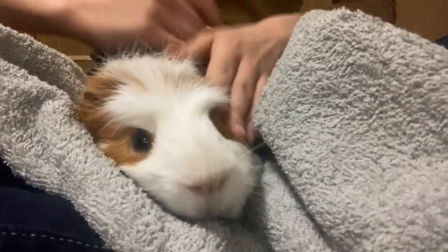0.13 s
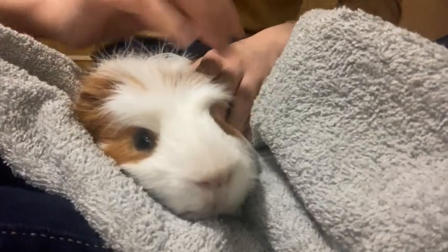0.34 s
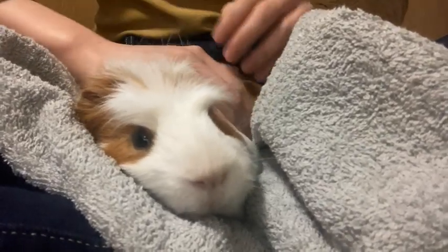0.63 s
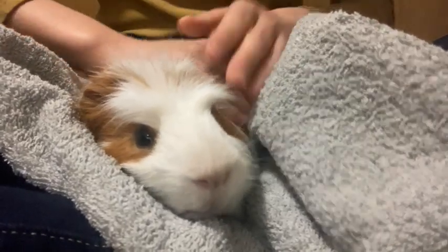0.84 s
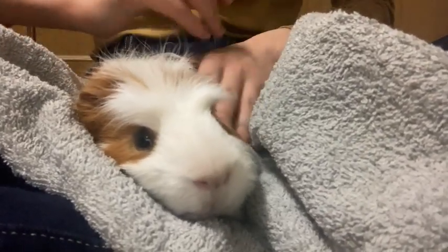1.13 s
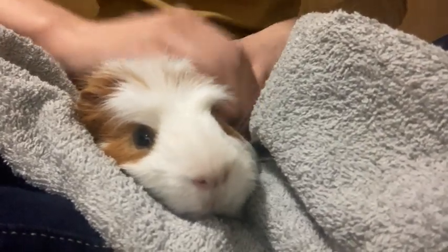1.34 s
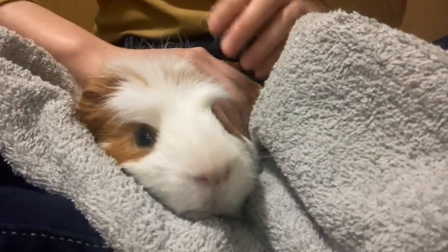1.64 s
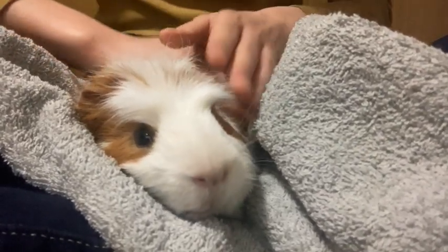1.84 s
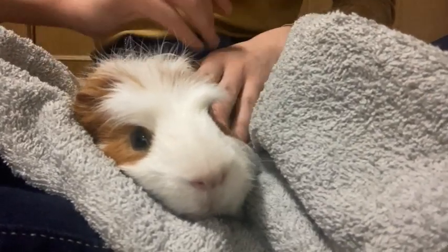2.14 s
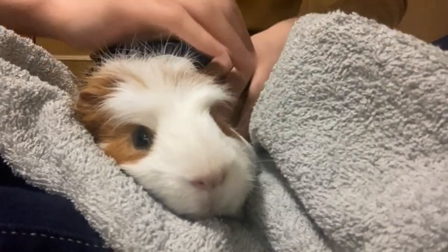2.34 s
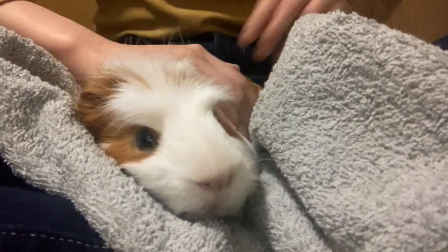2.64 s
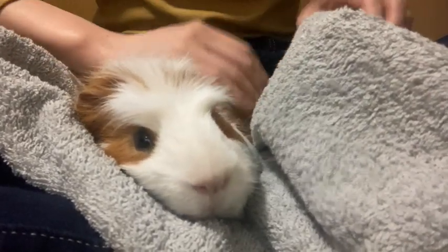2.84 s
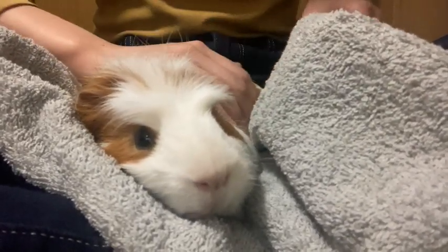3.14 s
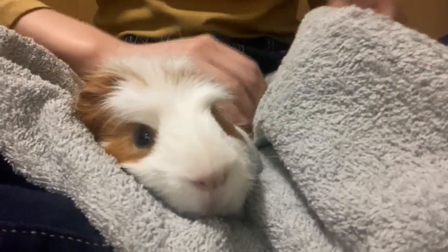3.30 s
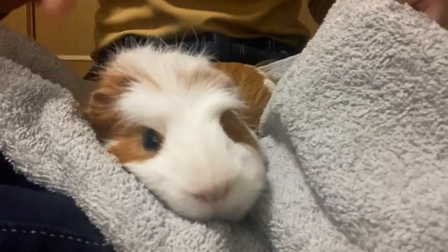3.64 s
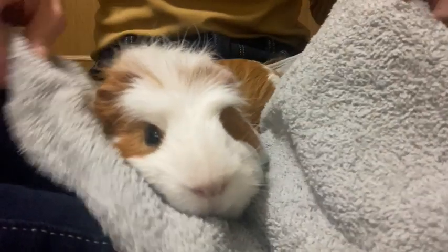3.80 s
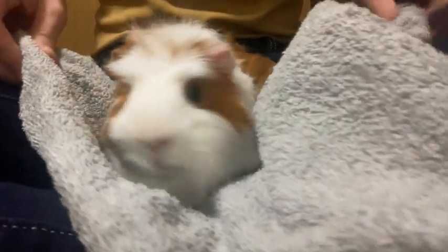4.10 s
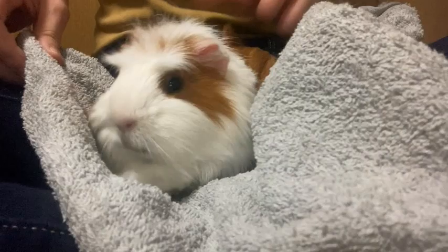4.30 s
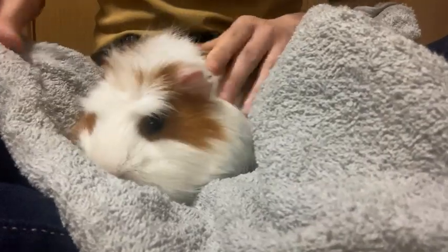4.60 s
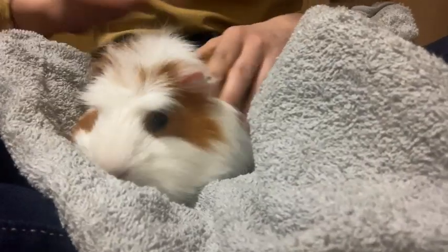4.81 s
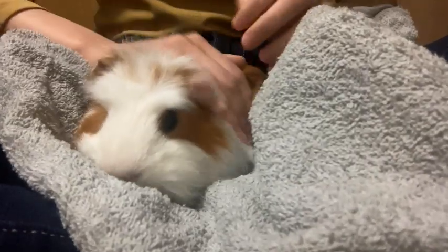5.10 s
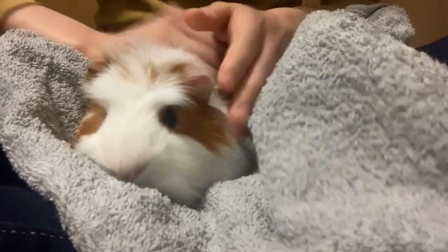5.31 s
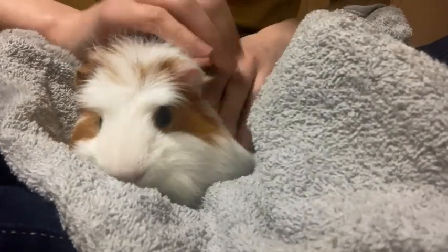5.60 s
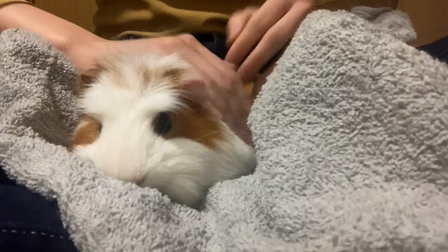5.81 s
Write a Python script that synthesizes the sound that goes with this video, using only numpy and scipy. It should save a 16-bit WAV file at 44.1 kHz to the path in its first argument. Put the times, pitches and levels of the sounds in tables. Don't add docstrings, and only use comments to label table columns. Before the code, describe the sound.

Rapid nasal guinea pig chutters come in evenly pulsed bouts with small gaps, over faint room hush and gentle stroking rustle.

```python
import sys
import numpy as np
from scipy import signal
from scipy.fft import rfft, irfft, next_fast_len
from scipy.io import wavfile
from scipy.ndimage import uniform_filter1d

SR = 44100
rng = np.random.default_rng(int(sys.argv[2]) if len(sys.argv) > 2 else 0)


def store_pcm(level_fs):
    pcm = np.round(np.clip(level_fs, -1, 1) * 32767).astype(np.int16)
    wavfile.write(sys.argv[1], SR, np.atleast_2d(pcm).T)


def undo_db(level):
    steps = np.asarray(level, float) / 20
    return 10 ** steps


N = 262395

# hz, lead_rad
LAG = [(100, 0), (250, -.35), (860, -.7), (1550, -1.3), (2000, -1.7), (3000, -2.6), (5100, -4.4),
       (6700, -2.7), (8400, -.4), (11100, 3.1), (13300, 6.0), (15200, 8.2)]


def evened(x):
    return x / np.sqrt(np.mean(x ** 2) + 1e-20)


def read(points, hz):
    f, value = np.transpose(points)
    return np.interp(np.log(hz + 1), np.log(f + 1), value)


def add(mix, s, sound):
    part = mix[max(round(s * SR), 0):][:len(sound)]
    part += sound[:len(part)]


def resonate(x, hz, width):
    r = np.exp(-np.pi * width / SR)
    return 2 * signal.lfilter([1 - r], [1, -r * np.exp(2j * np.pi * hz / SR)], x).real


def ports(x, balance):
    size = next_fast_len(N + 4096)
    hz = np.fft.rfftfreq(size, 1 / SR)
    tilt = undo_db(read(balance, hz) / 2) * np.exp(.5j * read(LAG, hz))
    gains = np.array([tilt, 1 / tilt]) * 2 / abs(tilt + 1 / tilt).clip(1.4)
    return irfft(rfft(x, size) * gains, size)[:, :N]


def hiss(spectrum, size, patchy_db, flicker_db):
    # hz, likeness_0_to_1
    likeness = [(30, .97), (100, .84), (300, .92), (1000, .8), (3000, .75), (5000, .6), (8500, .8),
                (13000, .62)]
    frames, hz = 4 * N // size + 5, np.fft.rfftfreq(size, 1 / SR)
    a, b, c, d, patches = rng.standard_normal((frames, len(hz), 5)).T
    patches = uniform_filter1d(patches, size=6, axis=0)
    patches = evened(uniform_filter1d(patches, size=10, axis=1))
    flicker = evened(uniform_filter1d(rng.standard_normal(frames), size=3))
    same = np.clip(read(likeness, hz), 0, 1)[:, None]
    left = a + 1j * b
    right = same * left + np.sqrt(1 - same ** 2) * (c + 1j * d)
    right = right * np.exp(-1j * read(LAG, hz))[:, None]
    level_db = read(spectrum, hz)[:, None] + patchy_db * patches + flicker_db * flicker
    z = np.array([left, right]) * undo_db(level_db)
    out = signal.istft(z, nperseg=size, noverlap=3 * size // 4)[1][:, :N]
    return out / np.sqrt(np.mean(out.mean(0) ** 2))


def hush():
    # hz, level_db_per_hz
    hush_colour = [(60, -49), (164, -26), (263, -2), (600, -15.5), (2070, -17), (3500, -18), (6300, -24.5),
                   (8700, -24), (11300, -19.5), (12900, -35), (15600, -25.5)]
    return undo_db(-76.5) * hiss(hush_colour, size=1024, patchy_db=1.5, flicker_db=.6)


def rumble():
    # hz, level_db_per_hz
    rumble_colour = [(28, -60), (38, -19), (50, 3), (66, -12), (110, -18), (160, -23), (220, -28),
                     (400, -70)]
    return undo_db(-70) * hiss(rumble_colour, size=2048, patchy_db=3.5, flicker_db=1.5)


def room(x):
    # hz, t60_s
    decay = [(250, 0.46), (600, 0.11), (1500, 0.13), (4000, 0.31)]
    taps = np.zeros((2, SR // 2))
    starts = np.arange(200, SR // 2 - 20, 20)
    at = starts + rng.integers(0, 20, (2, len(starts)))
    np.put_along_axis(taps, at, rng.choice([-1., 1.], at.shape), 1)
    taps[1] = 0.85 * taps[0] + 1.07 * taps[1]
    hz, t, z = signal.stft(taps, SR, nperseg=256)
    tail = signal.istft(z * undo_db(-60 * t / read(decay, hz)[:, None]), SR, nperseg=256)[1]
    return signal.fftconvolve(x[None], tail / np.linalg.norm(tail[0]), axes=1)[:, :N]


def rustle(voice):
    # start_s, fine_db, coarse_db
    stirs = [
        [(0.0, -65, -60.5), (.09, -81, -107), (.2, -109, -111)],
        [(.76, -90, -92), (.8, -74.5, -79), (.94, -74, -79), (1.0, -89, -100)],
        [(1.73, -84, -96), (1.78, -69, -90), (1.93, -74, -84), (1.98, -100, -100)],
        [(2.88, -90, -84), (2.97, -74.5, -77), (3.02, -95, -95)],
        [(3.28, -94, -79.5), (3.38, -88, -80.5), (3.43, -104, -84)],
        [(3.62, -105, -103), (3.72, -67, -71.5), (3.9, -67, -70), (4.1, -66.5, -67.5), (4.15, -76, -74),
         (4.18, -100, -86)],
        [(4.38, -92, -99), (4.46, -66, -69.5), (4.53, -77.5, -84.5), (4.595, -67, -82), (4.625, -85, -87)],
        [(5.12, -83, -84.5), (5.25, -70.5, -83.5), (5.42, -75, -104), (5.48, -87, -106)],
    ]
    # hz, level_db_per_hz
    fur_colour = [(4500, -50), (7000, -15), (7700, -8), (8500, 0), (10300, -5), (11400, -27), (12500, -8),
                  (14300, -9), (15600, -19)]
    # hz, level_db_per_hz
    towel_colour = [(120, -15), (260, 6), (700, 4), (1500, 4), (2400, 1), (3300, 0), (4300, -1), (5200, -6),
                    (6600, -10), (8000, -40)]
    breath_fine_db, breath_coarse_db = -31, -35.5

    t = np.arange(N) / SR
    effort = abs(uniform_filter1d(uniform_filter1d(voice ** 2, size=1800), size=1200))
    fine = effort * undo_db(2 * breath_fine_db)
    coarse = effort * undo_db(2 * breath_coarse_db)
    for rows in stirs:
        s, fine_db, coarse_db = np.transpose(rows)
        fine = fine + undo_db(2 * np.interp(t, s, fine_db, -150, -150))
        coarse = coarse + undo_db(2 * np.interp(t, s, coarse_db, -150, -150))
    fur = np.sqrt(fine) * hiss(fur_colour, size=256, patchy_db=3.5, flicker_db=0.0)
    towel = np.sqrt(coarse) * hiss(towel_colour, size=512, patchy_db=1.5, flicker_db=1.3)
    return fur + undo_db(9.5) * towel


def brushes():
    # start_s, length_s, centre_hz, width_hz, level_db
    puffs = [(4.575, 0.046, 2800, 2700, -60), (4.47, 0.13, 3400, 1700, -70), (6, 0.089, 13800, 2400, -65),
             (6.3, 0.21, 14300, 2600, -71), (2.02, 0.051, 12600, 4300, -73), (5.16, 0.21, 4000, 1500, -77)]
    out = np.zeros((2, N))
    grains_of_all = rng.standard_normal((len(puffs), 2, SR // 2))
    for (s, length, hz, width, db), grains in zip(puffs, grains_of_all):
        t = np.arange(0, length, 1 / SR)
        for port, grain in zip(out, grains):
            puff = evened(resonate(resonate(grain[:len(t)], hz, width), hz, width))
            add(port, s, undo_db(db) * np.sin(np.pi * t / length) * puff)
    return out


def scuff():
    # pitch_hz, level_db
    tones = [(1330, -49), (2050, -55), (3330, -57)]
    start_s, length_s = 4.037, .009
    out, t = np.zeros(N), np.arange(0, length_s, 1 / SR)
    swell = np.sin(np.pi * t / length_s)
    for hz, db in tones:
        add(out, start_s, undo_db(db) * swell * np.sin(2 * np.pi * hz * t * (1 + 0.98 * t)))
    return out


def ticks(t60=0.028):
    # start_s, peak_db
    clicks = [(1.093, -52.5), (1.134, -54.5), (1.2087, -51), (1.239, -53.5), (1.449, -52), (1.572, -52.5),
              (1.789, -60), (1.835, -60), (2.1955, -55.5), (2.64, -56), (3.046, -53.5), (3.641, -50),
              (4.3964, -58.5), (3.554, -56.5), (5.594, -65), (0.862, -59), (1.544, -51.5)]
    out, t = np.zeros(N), np.arange(700) / SR
    for (s, db), grain in zip(clicks, rng.standard_normal((len(clicks), 700))):
        add(out, s, undo_db(db - 60 * t / t60) * (1 - np.exp(-t / 0.0035)) * grain)
    return sum(2.73 * resonate(resonate(out, hz, 2700), hz, 2700) for hz in (8900, 13300))


def thumps(rise=0.0047, t60=0.13):
    # start_s, peak_db, pitch_hz
    knocks = [(0.944, -48, 253.4), (1.137, -46.5, 259), (1.238, -47, 270), (1.838, -43.5, 303),
              (1.952, -57, 292), (2.147, -44, 256), (2.641, -49, 254.7), (2.761, -42.5, 252),
              (3.055, -50, 298), (3.25, -47.5, 275.4), (3.418, -44.5, 258), (3.639, -44.5, 256),
              (3.758, -55, 255), (3.965, -38, 317), (4.17, -56, 265), (4.39, -39, 252.5),
              (4.461, -58.5, 316), (4.777, -54, 254), (4.968, -45.5, 273), (4.99, -48.5, 243),
              (5.294, -48.5, 268.4), (5.521, -49.5, 255), (5.582, -45.5, 270), (5.715, -54, 235),
              (2.887, -57.5, 255), (4.038, -54.5, 285), (4.684, -56.5, 255)]
    out, t = np.zeros(N), np.arange(6000) / SR
    for s, db, hz in knocks:
        swell = undo_db(db + 8.0 - 60 * t / t60) * (1 - np.exp(-t / rise))
        add(out, s, swell * np.sin(2 * np.pi * hz * t))
    return out


def lap_ring(voice):
    # hz, width_hz, level_db
    hollow = [(255, 16, 18), (297.8, 10, 15.5), (394.4, 23.3, 4), (443.2, 15.8, 2), (543, 107, 3)]
    return sum(undo_db(db) * resonate(voice, hz, width) for hz, width, db in hollow)


def creaks(uneven=.15, uneven_db=2.5):
    # start_s, length_s, snaps_per_s, level_db
    runs = [(2.136, .012, 125, -54), (4.173, .004, 150, -56.5), (4.332, .001, 160, -44),
            (4.933, .005, 150, -49.5), (4.95, .072, 150, -46), (4.634, .001, 150, -60),
            (5.286, .03, 140, -55.5), (5.522, .005, 146, -62), (5.546, .004, 110, -42.5),
            (5.588, .012, 180, -49), (5.71, .03, 200, -47.5)]
    # hz, width_hz, level_db
    throat = [(532, 460, 2), (1026, 250, -6), (1990, 430, -9.5), (3230, 440, -22)]
    snaps = np.zeros(N)
    for s, length, rate, db in runs:
        chance = rng.standard_normal((2, 20))
        gaps = (1 + uneven * chance[0, 1:]).clip(.5) / rate
        at = s + np.r_[0, np.cumsum(gaps)]
        keep = at <= s + length
        snaps[(at[keep] * SR).astype(int)] += undo_db(db + uneven_db * chance[1][keep])
    snaps = signal.sosfilt(signal.butter(6, 3700, fs=SR, output="sos"), snaps)
    return sum(undo_db(db) * resonate(resonate(snaps, hz, w), hz, w) * SR / w / 3 for hz, w, db in throat)


def slips(t, turns):
    # start_s, length_s, cycles_in_group, depth_0_to_1
    spells = [(.942, .028, 2, .6), (1.254, .02, 2, .55), (1.938, .016, 2, .55), (2.318, .075, 2, .45),
              (2.755, .015, 2, .6), (3.235, .035, 2, .7), (3.69, .025, 2, .55), (4.35, .042, 3, .8),
              (4.405, .014, 2, .55), (4.66, .03, 3, .55), (5.092, .04, 2, .75), (5.315, .05, 2, .55),
              (5.597, .035, 3, .7)]
    slipping, uneven = 0, 1
    for at, length, group, depth in spells:
        share = depth * np.clip(np.minimum(t - at, at + length - t) / 0.0065, 0, 1)
        slipping = slipping + share
        uneven = uneven * (1 + share * np.sin(2 * np.pi * turns / group + 0.86))
    return slipping, uneven


def overtone_stack(hz, turns, level_db, slipping, wobble, lifted):
    overtones = [5, -3, -7.5, -11, -14.5, -21.5, -19, -21.5, -31, -36]
    # hz, gain_db
    nose_shut = [(150, -32), (300, 9), (500, -0.6), (900, 0.4), (1400, 1.4), (2000, -6.5), (2380, -9),
                 (2600, -37.5), (2880, -58), (3250, -21.5), (4400, -40)]
    # hz, gain_db
    nose_open = [(150, 0), (300, 9), (700, 15.5), (1200, 15.5), (1700, 12), (2500, 16), (3500, -3),
                 (3900, -14), (4800, -47)]
    nose = nose_open if lifted else nose_shut
    bright_db = (-1.6 if lifted else 3) + 0.3527 * (level_db + 38.5) + 3.5 * slipping
    stack, power = 0, 0
    for k, db in enumerate(overtones, 1):
        second_db = 3 if lifted and k == 2 else 0
        gain = undo_db(db + bright_db * (k - 1) + read(nose, k * hz) + second_db)
        stack = stack + gain * undo_db(.9 * min(k, 3) * wobble[k]) * np.sin(2 * np.pi * k * turns)
        power = power + gain ** 2
    return stack / np.sqrt(power / 2)


def leaking_air(grain, turns, lifted):
    top_hz = 3600 if lifted else 2450
    air = resonate(grain * (1 + np.cos(2 * np.pi * turns)), 900, 1200)
    return evened(signal.sosfilt(signal.butter(8, top_hz, fs=SR, output="sos"), air))


def rasp(grain, turns, lifted):
    hz, width, level_db = (2960, 1200, -34) if lifted else (3850, 1400, -38.5)
    puffs = grain * (1 + np.cos(2 * np.pi * turns)) ** 2
    for _ in range(3):
        puffs = resonate(puffs, hz, width)
    return undo_db(level_db) * evened(puffs)


def warble(rows, rise=0.00095, fall=0.0049):
    s, bend_hz, effort_db = np.transpose(sorted(rows))
    lifted = s[0] > 4.3
    t = np.arange(s[0], s[-1], 1 / SR)
    hz = np.exp(uniform_filter1d(np.interp(t, s, np.log(bend_hz)), size=220, mode="nearest"))
    level_db = uniform_filter1d(np.interp(t, s, effort_db), size=130, mode="nearest")
    chance = rng.standard_normal((14000, 12))[:len(t)].T
    grain = chance[0]
    wobble = evened(uniform_filter1d(uniform_filter1d(chance[1:], size=130), size=130))
    slack = np.clip((420 - hz) / 100, 0, 1)
    turns = np.cumsum(hz * (1 + (.014 + .04 * slack) * wobble[0])) / SR
    slipping, uneven = slips(t, turns)
    tone = uneven * overtone_stack(hz, turns, level_db, slipping, wobble, lifted)
    tone = tone + rasp(grain, turns, lifted)
    air = undo_db(-21 + 17.5 * slack) * leaking_air(grain, turns, lifted)
    edges = np.clip((t - s[0]) / rise, 0, 1) * np.clip((s[-1] - t) / fall, 0, 1)
    return s[0], undo_db(-4 + level_db) * edges * (tone + air)


def guinea_pig_voice():
    # start_s, pitch_hz, effort_db
    first_calls = [
        [(0.0, 406, -39.5), (0.039, 379.4, -43.5), (0.05, 443, -42.5), (0.058, 543, -42.5), (0.069, 520, -47.5),
         (0.079, 506, -66)],
        [(0.111, 408, -38.5), (0.116, 407, -48), (0.132, 590, -50.5), (0.173, 424, -50), (0.191, 730, -52),
         (0.198, 540, -69)],
        [(0.376, 372, -52.5), (0.393, 654, -49), (0.409, 619, -46.5), (0.43, 443, -47.5), (0.449, 807, -43),
         (0.457, 905, -38.5), (0.467, 920, -57)],
        [(0.488, 500, -41), (0.501, 360.3, -41.5), (0.509, 345.5, -46), (0.523, 533, -44), (0.54, 464, -43),
         (0.559, 643, -47), (0.57, 512, -44)],
        [(0.585, 559, -45.5), (0.594, 845, -39), (0.605, 754, -44), (0.623, 433, -40), (0.646, 464, -39.5),
         (0.661, 873, -44.5), (0.668, 880, -32)],
        [(0.8, 460, -43.5), (0.806, 338, -55.5), (0.813, 388.5, -43), (0.821, 700, -44.5), (0.842, 575, -43.5),
         (0.853, 384, -39), (0.859, 316, -46)],
        [(0.862, 399, -49), (0.881, 878, -37), (0.897, 485, -52), (0.91, 580, -38), (0.924, 367, -41.5),
         (0.94, 485, -45.5), (0.958, 567, -46.5), (0.973, 870, -51.5)],
        [(1.085, 465, -49), (1.093, 448, -41), (1.107, 596, -40.5), (1.125, 506.5, -38.5), (1.146, 443, -44),
         (1.159, 565, -40), (1.175, 1090, -41), (1.182, 1130, -32)],
    ]
    quick_calls = [
        [(1.196, 660, -44), (1.21, 386.6, -36), (1.227, 508, -41), (1.245, 397, -40.5), (1.254, 570, -40),
         (1.261, 657, -41), (1.28, 843, -40), (1.287, 888, -67)],
        [(1.4, 618, -49), (1.411, 576, -39.5), (1.425, 570, -38.5), (1.443, 457.5, -40), (1.46, 390, -42.5),
         (1.464, 420, -42.5), (1.48, 1037, -43.5), (1.491, 1290, -37.5)],
        [(1.51, 485, -42.5), (1.524, 377.7, -43), (1.545, 408.3, -39.5), (1.561, 473, -41)],
        [(1.574, 603, -45), (1.589, 1102, -40), (1.603, 833, -47.5), (1.62, 470.4, -45.5),
         (1.631, 405.5, -38.5), (1.645, 530, -40), (1.658, 837, -44), (1.665, 696, -59)],
        [(1.777, 459, -46.5), (1.786, 367, -43), (1.803, 612, -41.5), (1.826, 460.6, -40.5),
         (1.845, 323, -48.5), (1.857, 820, -40), (1.867, 1130, -36.5), (1.878, 1270, -64)],
        [(1.89, 583, -43), (1.906, 363, -43.5), (1.928, 422, -42.5), (1.948, 469, -49.5), (1.965, 848, -44.5),
         (1.976, 807, -44.5), (1.99, 663, -51)],
    ]
    long_calls = [
        [(2.137, 429, -47.5), (2.15, 323.7, -46.5), (2.166, 559, -39.5), (2.18, 561, -41), (2.198, 371, -42.5),
         (2.205, 412, -39.5), (2.229, 1147, -45.5), (2.235, 1165, -33.5), (2.248, 724, -55)],
        [(2.255, 572, -39.5), (2.263, 368, -43), (2.283, 460.5, -42), (2.308, 397.6, -40.5), (2.329, 635, -48)],
        [(2.337, 748, -43), (2.35, 665, -46), (2.362, 783, -44.5), (2.372, 687, -46), (2.385, 714, -46.5),
         (2.41, 682, -48), (2.433, 968, -47), (2.438, 1200, -51.5), (2.443, 980, -60)],
        [(2.584, 396, -47), (2.594, 325, -56), (2.607, 736, -43.5), (2.626, 640.6, -44.5), (2.642, 360, -41.5)],
        [(2.65, 472, -50.5), (2.663, 808, -43), (2.677, 1153, -37.5), (2.683, 1103, -44), (2.692, 784, -43),
         (2.709, 442.4, -40.5), (2.74, 440.3, -42.5), (2.769, 413, -47)],
        [(2.768, 577, -49), (2.785, 800, -43.5), (2.796, 951, -46), (2.816, 593, -45.5), (2.836, 648, -47),
         (2.845, 806, -53), (2.853, 700, -53)],
    ]
    restless_calls = [
        [(2.993, 420, -44), (3.001, 374.3, -47.5), (3.017, 709.5, -44.5), (3.032, 648, -44.5),
         (3.049, 387.4, -41.5), (3.058, 343.5, -46)],
        [(3.057, 428, -43), (3.074, 991, -39), (3.087, 977, -41), (3.102, 461, -45), (3.108, 439, -41.5),
         (3.118, 513.5, -46.5)],
        [(3.135, 422, -41.5), (3.144, 480, -45.5), (3.168, 942, -43), (3.179, 1007, -42), (3.189, 862, -42.5),
         (3.203, 407, -44.5)],
        [(3.211, 322, -44), (3.227, 504, -40.5), (3.242, 526, -44.5), (3.258, 463.3, -47), (3.272, 732, -45.5),
         (3.286, 955, -43)],
        [(3.415, 307, -57), (3.427, 317, -47), (3.434, 703, -44), (3.449, 625, -41.5), (3.471, 384, -41.5),
         (3.482, 454, -44.5), (3.498, 1175, -36.5), (3.504, 1130, -52)],
        [(3.527, 609, -36), (3.535, 440, -38), (3.546, 488, -39.5), (3.563, 357, -41.5), (3.583, 547, -41.5),
         (3.6, 1033, -40.5), (3.612, 960, -45)],
        [(3.631, 580, -44.5), (3.644, 300, -48.5), (3.653, 476, -39.5), (3.665, 609, -43), (3.679, 420, -42.5),
         (3.694, 629, -41), (3.721, 905, -51.5)],
        [(3.847, 392, -46), (3.853, 377, -51.5), (3.868, 648, -43.5), (3.891, 607, -41.5),
         (3.908, 292.6, -47.5), (3.923, 806, -40), (3.934, 529, -44), (3.943, 320, -43)],
        [(3.953, 344.3, -43.5), (3.971, 306, -45.5), (3.992, 476, -43.5), (4.004, 376.4, -46.5),
         (4.02, 306, -42.5)],
    ]
    head_up_calls = [
        [(4.344, 608, -40.5), (4.361, 705, -49.5), (4.373, 580, -45)],
        [(4.374, 512, -51), (4.382, 509, -42), (4.393, 325, -52), (4.425, 624, -40.5), (4.436, 690, -45.5),
         (4.444, 644, -63)],
        [(4.644, 612, -61), (4.657, 765, -49.5), (4.669, 686, -49), (4.679, 549, -53), (4.693, 722, -50),
         (4.708, 950, -52.5), (4.721, 884, -53)],
        [(4.747, 511, -49.5), (4.759, 557, -43.5), (4.776, 615, -45.5)],
        [(4.779, 585, -44), (4.794, 663, -43), (4.805, 750, -42.5)],
        [(5.024, 1108, -50), (5.037, 1590, -44), (5.045, 1111, -40), (5.06, 442.4, -45.5), (5.095, 623, -45),
         (5.123, 650, -41.5), (5.131, 912, -39.5), (5.139, 920, -39)],
        [(5.311, 523, -50.5), (5.324, 412, -52.5), (5.344, 524, -57.5), (5.363, 521, -48), (5.376, 864, -59),
         (5.382, 1024, -47), (5.401, 715, -56), (5.413, 684, -45), (5.441, 644, -60.5)],
        [(5.563, 635, -41), (5.585, 314, -50)],
        [(5.591, 562, -55), (5.596, 477, -43), (5.621, 644, -45.5), (5.633, 858, -40), (5.652, 593, -43),
         (5.675, 417, -47), (5.695, 624, -44.5), (5.712, 480, -49)],
        [(5.738, 424, -47.5), (5.754, 600, -49), (5.765, 606, -49.5), (5.773, 734, -54)],
        [(5.774, 756, -55), (5.789, 661, -50), (5.808, 569, -49.5), (5.819, 733, -54), (5.831, 694, -63)],
    ]
    carried_on = (4, 6, 11, 15, 16, 18, 19, 21, 22, 23)
    voice = creaks()
    calls = []
    for k, rows in enumerate(first_calls + quick_calls + long_calls + restless_calls + head_up_calls):
        if k in carried_on:
            calls[-1] = calls[-1] + list(rows)
        else:
            calls.append(list(rows))
    for rows in calls:
        add(voice, *warble(rows))
    return voice


def scene():
    # hz, left_minus_right_db
    voice_side = [(250, 0), (500, 0), (900, -3.5), (1300, -12.5), (2400, -3.5), (4000, -16)]
    voice = guinea_pig_voice()
    animal = ports(voice + lap_ring(voice) + thumps(), voice_side) + undo_db(-7.5) * room(voice)
    mouth = ports(ticks(), [(100, 0), (9000, 0.0049)])
    hands = scuff() + brushes() + rustle(voice)
    return animal + mouth + hands + hush() + rumble()


def low_pass(x):
    return signal.sosfilt(signal.butter(12, 15690, fs=SR, output="sos"), x)


def record(dry):
    mix = signal.sosfilt(signal.butter(4, 40, "high", fs=SR, output="sos"), dry)
    return low_pass(mix)


dry = scene()
out = record(dry)
store_pcm(out)
```